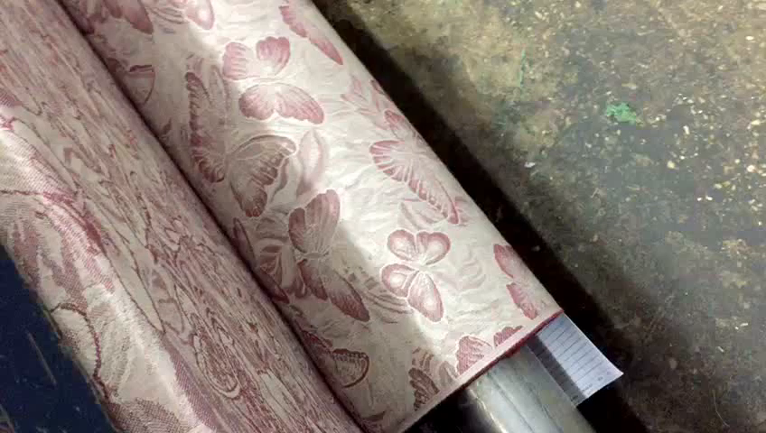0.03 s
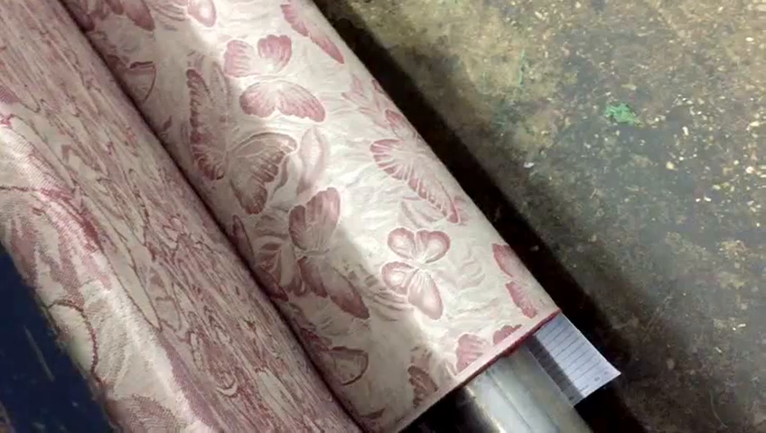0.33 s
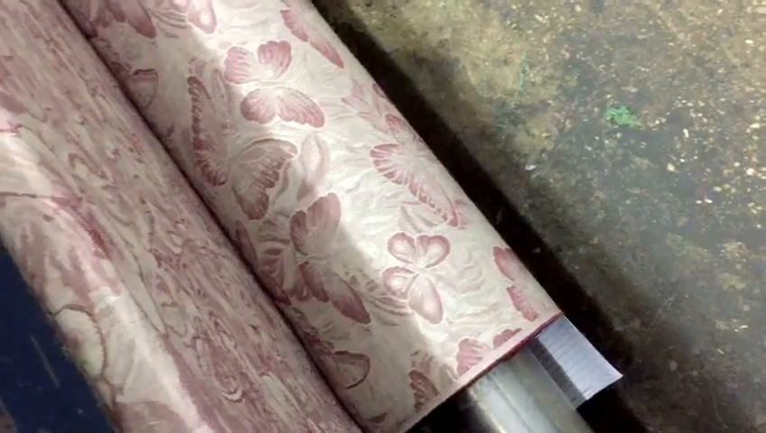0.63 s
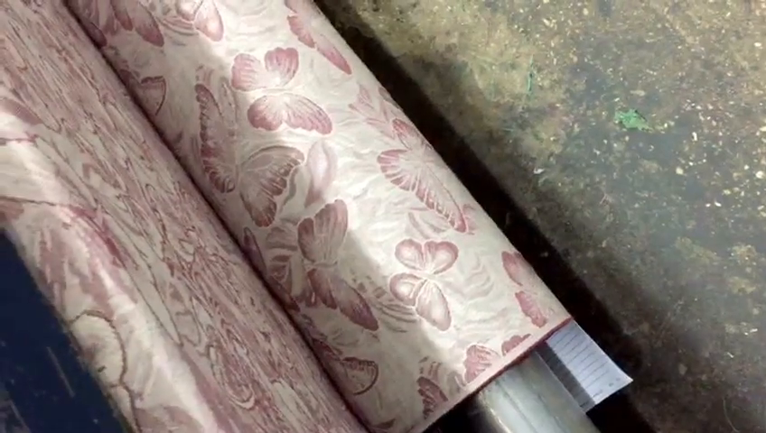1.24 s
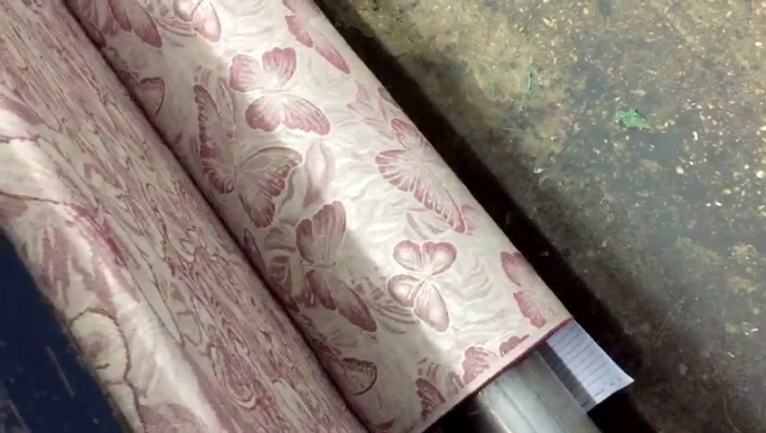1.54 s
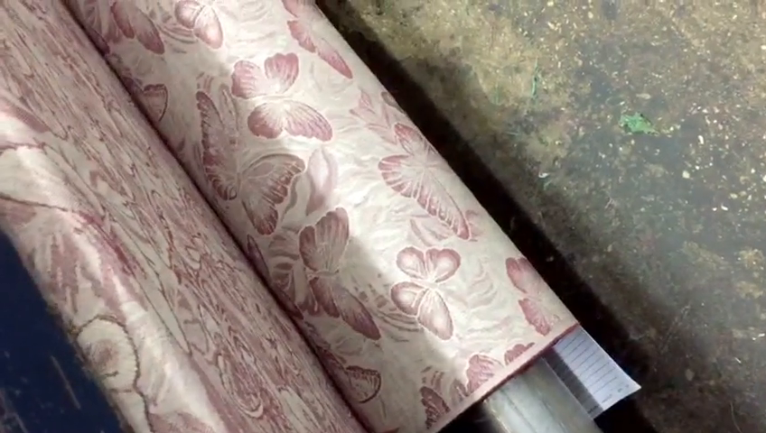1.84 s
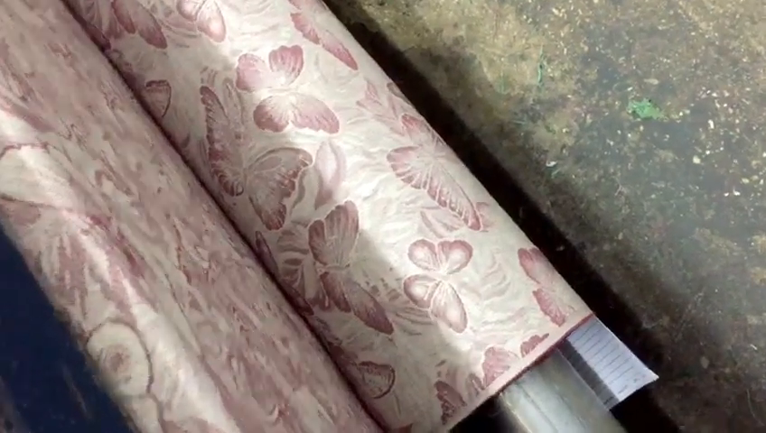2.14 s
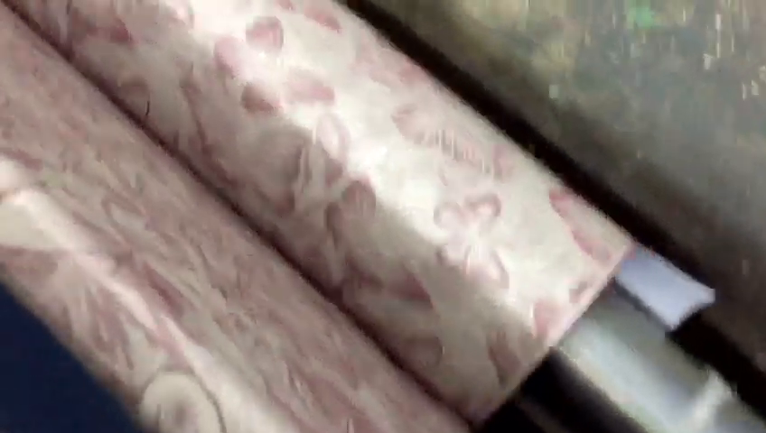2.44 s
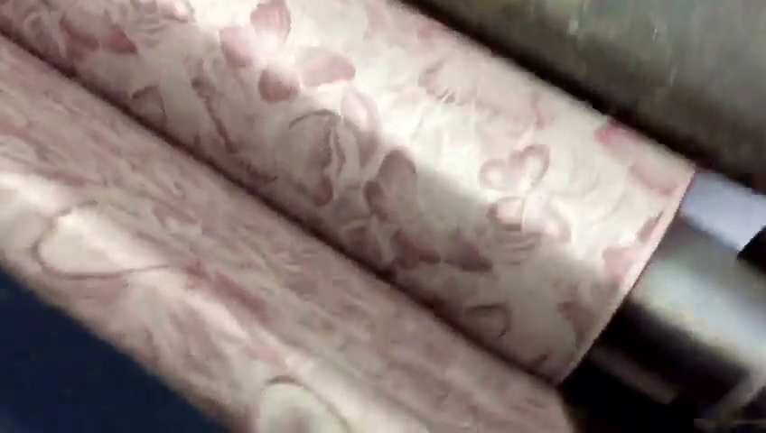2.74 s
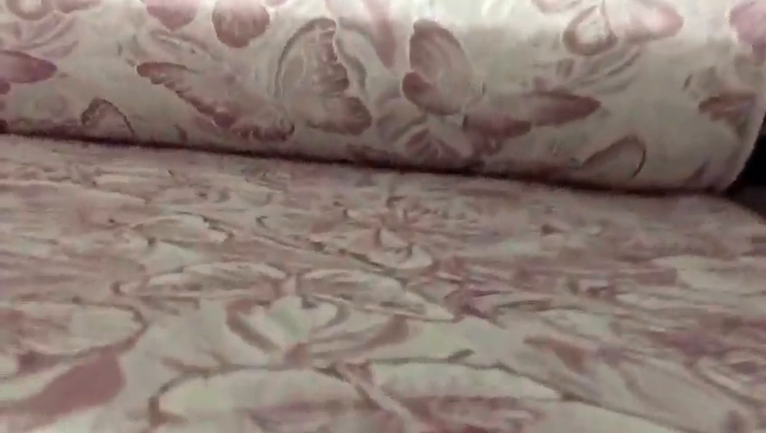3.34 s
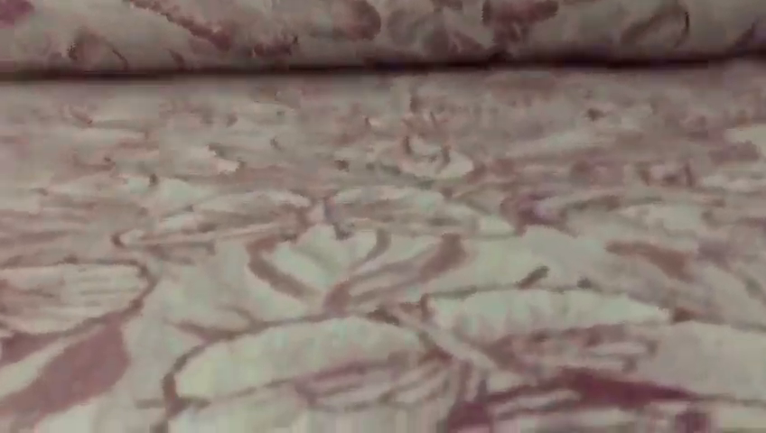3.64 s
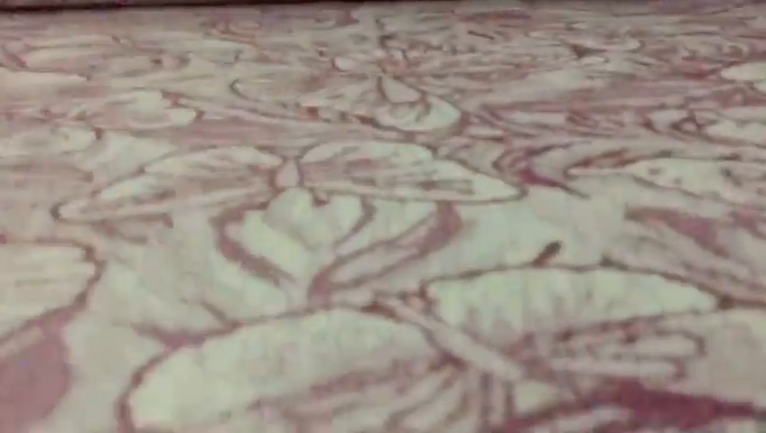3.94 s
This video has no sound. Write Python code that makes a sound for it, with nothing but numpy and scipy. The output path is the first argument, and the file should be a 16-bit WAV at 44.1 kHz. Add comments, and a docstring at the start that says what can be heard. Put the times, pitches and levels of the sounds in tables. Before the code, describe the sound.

A power loom runs close by, thumping and clacking almost six times a second with rattling metal and short swishes. Other machines roar steadily in the workshop, and the clatter dulls slightly as the microphone turns to the cloth.

```python
"""A workshop full of machine din, where a power loom close by runs at almost six picks a second.
In every cycle the same blows excite the modes of the frame and rattle its metal parts, the reed heaves,
the weft carrier swishes out and in, and a rubbing part groans. The drive drones and hums, wire heddles
tick, and a few faint hoots rise over the din. The treble dulls as the microphone turns to the cloth."""
import sys
import numpy as np
from scipy import signal
from scipy.fft import rfft, irfft, next_fast_len
from scipy.io import wavfile
from scipy.ndimage import map_coordinates

SR = 44100
rng = np.random.default_rng(int(sys.argv[2]) if len(sys.argv) > 2 else 0)


def write(x):
    x = np.atleast_2d(x).T
    wavfile.write(sys.argv[1], SR, np.round(np.clip(x, -1, 1) * 32767).astype(np.int16))


N = 176400
FIRST_BEAT_S, CYCLE_S = .13, .16998  # the beat-up: the reed drives the weft into the cloth

# Spectra of the other machines, the wooden and cast parts, the loose steel and the sliding carrier.
# Each row: frequency in Hz, relative spectral density in dB.
DIN_SPECTRUM = [(25, -28), (40, -17), (54, -6.5), (85, -3.5), (180, -2), (300, -3.5), (440, -7), (560, -3),
                (720, -6.5), (800, -10), (1000, -10.5), (1250, -15), (1700, -11.5), (2800, -14.5),
                (4200, -19.5), (5000, -22.5), (7000, -24.5), (10000, -30)]
KNOCK_SPECTRUM = [(60, -28), (170, -5.5), (300, 7.5), (440, -6), (620, -8.5), (800, 0), (1020, 4.5),
                  (1250, -14.5), (2500, -42), (9000, -52)]
CLACK_SPECTRUM = [(300, 1), (900, 9.5), (1250, 3.5), (1700, 9.5), (2800, 6), (4300, 1.5), (5000, 0),
                  (6300, -0.5), (10000, -7)]
SWISH_SPECTRUM = [(500, -20), (1300, 3), (1900, -2), (3000, 2.5), (4200, -2.5), (4900, -2), (6500, 0),
                  (8000, -1.5), (10000, -4)]
# Resonances of the drive and the loose steel. Each row: frequency in Hz, width in Hz, relative gain in dB.
DRIVE_MODES = [(121, 15, -5), (501, 15, -4), (537, 14.5, 0.5), (634, 34, -8.5), (717, 40, -11.5)]
STEEL_MODES = [(1498, 25, -6.5), (1590, 27, -2.5), (1803, 38, -8), (1933, 24, -0.5), (2160, 32, -0.5),
               (2346, 32, -4.5), (2790, 62, -3.5), (3313, 80, -6.5), (4360, 180, -8)]
# Tones of the motor and gears. Each row: frequency in Hz, starting level in dB, final level in dB.
HUM_TONES = [(132.2, -25.5, -23.5), (301, -36, -26.5), (550, -28, -29.5)]
# Blows of one cycle. Each row: seconds from the beat-up, then relative thump, knock and clack in dB.
CYCLE_BLOWS = [(-.033, -7.5, -3.5, -4.5), (-.0125, -3, -3.5, -1.5), (-.003, 3.5, 1.5, 2),
               (.0015, -12.5, -1.5, 1.5), (.008, -1, -5.5, -3), (0.021, -22, -2, -5.5),
               (.031, -7.5, -2.5, -7.5), (0.05, -18, -16, -13), (0.067, -9.5, -27, -20),
               (.100, -25, -39, -19)]
# Modes of the frame. Each row: frequency in Hz, relative level in dB, seconds to decay by 60 dB.
FRAME_MODES = [(85, -8.5, 0.079), (118.5, -1.5, 0.088), (138, -5.5, 0.05), (169, 1, 0.069),
               (206.4, -2.5, 0.031), (289, -3.5, 0.063), (360, -1, 0.075)]
# Nearness of the moving microphone. Each row: time in seconds, gains of heavy and loose parts in dB.
BLOW_NEARNESS = [(.1, 1.5, -0.5), (.6, -1, -2), (1.5, .5, -1.5), (2.6, -0.5, -0.5), (3.03, 0.5, -0.3),
                 (3.2, 1, -4.5), (4, 2, -6)]
# Carrier strokes. Each row: seconds from the beat-up, Gaussian half width in seconds, level in dB.
CARRIER_STROKES = [(-.023, 0.02, -21), (0.045, 0.016, -22)]
# Faint hoots. Each row: start in seconds, length in seconds, first and last pitch in Hz, level in dB.
HOOT_GLIDES = [(1.767, 0.081, 722, 730, -17), (2.521, .1, 624, 595, -19.5), (2.606, 0.042, 577, 525, -18),
               (2.686, 0.074, 693, 668, -19), (2.857, 0.27, 626, 612, -23), (3.08, 0.1, 605, 565, -23),
               (3.904, 0.056, 588, 568, -18.5)]
# Slow changes of the drive, steel, groan and treble. Each row: time in seconds, gain in dB.
DRIVE_GAIN = [(.1, -27.5), (1.2, -28), (2.3, -35), (2.8, -28.5), (3.4, -22.5), (4, -24)]
STEEL_GAIN = [(.1, -26.5), (3, -29), (3.25, -23.5), (4, -26)]
GROAN_GAIN = [(.1, -39), (2.4, -25), (3.25, -22), (3.469, -16), (3.8, -16), (4, -10)]
TREBLE_GAIN = [(.1, -1), (.45, -1), (0.699, 1), (1.801, 1), (2.601, 0.8), (3.1, -.5), (3.5, -0.6),
               (4, -1.5)]


def amp(db):
    """Amplitude grows tenfold with every 20 dB."""
    return 10 ** (np.asarray(db) / 20)


def unit(x):
    """Division by the rms gives a signal unit power."""
    return x / np.sqrt(np.mean(x ** 2) + 1e-20)


def clock():
    """Uniform sampling: the time of each sample in seconds."""
    return np.arange(N) / SR


def gain_curve(points):
    """A gain interpolated in decibels between (seconds, dB) points."""
    return amp(np.interp(clock(), *np.transpose(points)))


def since(moment_s):
    """Periodic time: signed seconds from the nearest recurrence of a moment in the cycle."""
    return (clock() - FIRST_BEAT_S - moment_s + CYCLE_S / 2) % CYCLE_S - CYCLE_S / 2


def wobble(rate):
    """Smooth random modulation through `rate` knots a second."""
    knots = rng.standard_normal(int(N * rate / SR) + 4)
    return map_coordinates(knots, [np.arange(N) * rate / SR])


def filtered(x, response):
    """A linear filter multiplies the spectrum by its frequency response."""
    size = next_fast_len(N + SR // 2)
    return irfft(rfft(x, size) * response(np.fft.rfftfreq(size, 1 / SR)), size)[:N]


def coloured(x, spectrum):
    """Spectral shaping by (Hz, dB) points, at unit power."""
    hz, db = np.transpose(spectrum)
    return unit(filtered(x, lambda f: amp(np.interp(np.log(f + 1), np.log(hz), db))))


def resonant(x, modes):
    """Forced response of parallel resonators of alternating sign, at unit power."""
    def response(f):
        return sum((-1) ** k * amp(db) * 1j * f * width / (hz * hz - f * f + 1j * f * width)
                   for k, (hz, width, db) in enumerate(modes))
    return unit(filtered(x, response))


def chatter(repeat):
    """Dense tiny contacts merge into noise; the share `repeat` of its power recurs every cycle."""
    periodic = np.resize(rng.standard_normal(round(CYCLE_S * SR)), N)
    return np.sqrt(repeat) * periodic + np.sqrt(1 - repeat) * rng.standard_normal(N)


def fading(hits, t60_s, attack_s=.00072):
    """Incoherent vibrations add in power: the joint envelope of decays starting at each hit."""
    t = np.arange(SR // 2) / SR
    decay = amp(-60 * t / t60_s) * (1 - np.exp(-t / attack_s))
    return np.sqrt(np.abs(signal.fftconvolve(hits ** 2, decay ** 2)[:N]))


def din(level_db=-17.5):
    """The other machines superpose into a steady, rattling roar."""
    return amp(level_db + .7 * wobble(60)) * coloured(chatter(repeat=.13), DIN_SPECTRUM)


def drive():
    """Forced vibration: gears and cams keep a few resonances of the machine droning."""
    return gain_curve(DRIVE_GAIN) * resonant(chatter(repeat=.53), DRIVE_MODES)


def hum(waver_hz=3.46, waver_db=3):
    """The changing load modulates the motor and gear tones in frequency and amplitude."""
    out = np.zeros(N)
    for hz, start_db, end_db in HUM_TONES:
        phase = 2 * np.pi * np.cumsum(hz + waver_hz * wobble(24.96)) / SR
        out += amp(np.linspace(start_db, end_db, N) + waver_db * wobble(12)) * np.sin(phase)
    return out


def heddle_ticks(per_second=110, level_db=-25.5, spread_db=5.5):
    """Wire heddles collide as a Poisson process, each contact a brief burst of bright noise."""
    contacts = rng.random(N) < per_second / SR
    hits = contacts * amp(spread_db * np.clip(rng.standard_normal(N), -2, 2))
    return amp(level_db) * fading(hits, t60_s=.013) * coloured(rng.standard_normal(N), SWISH_SPECTRUM)


def strikes(levels_db, jitter_s=.0003, scatter_db=1.0):
    """A nearly periodic impulse train: each blow of each cycle varies a little in time and strength."""
    beats = FIRST_BEAT_S + CYCLE_S * np.arange(int(N / SR / CYCLE_S) + 1)
    offsets = np.array(CYCLE_BLOWS)[:, :1]
    chance = rng.standard_normal((len(CYCLE_BLOWS), 2, len(beats)))
    times = (offsets + beats + jitter_s * chance[:, 0]).ravel()
    strengths = amp(levels_db[:, None] + scatter_db * chance[:, 1]).ravel()
    return np.bincount(np.round(times * SR).astype(int), strengths, N)[:N]


def frame_thump(hits, level_db=-15, attack_s=.00099):
    """The impulse response of the frame is a sum of damped modes."""
    t = np.arange(SR // 2) / SR
    ring = sum(amp(db - 60 * t / t60) * np.sin(2 * np.pi * hz * t) for hz, db, t60 in FRAME_MODES)
    onset = 1 - np.exp(-t / attack_s)
    return amp(level_db) * signal.fftconvolve(hits, ring * onset)[:N]


def knock(hits, level_db=-18):
    """Impacts on wooden and cast parts give damped bursts of midrange noise."""
    return amp(level_db) * fading(hits, t60_s=.079) * coloured(chatter(repeat=.48), KNOCK_SPECTRUM)


def steel_clatter(hits, clack_db=-12, hall_relative_db=-20):
    """Loose steel rattles and rings at its resonances; the hall reverberates after each clack."""
    envelope = fading(hits, t60_s=.045)
    rattle = chatter(repeat=.033) * amp(.54 * wobble(900))
    clack = envelope * coloured(rattle, CLACK_SPECTRUM)
    hall = fading(hits, t60_s=.37) * coloured(rng.standard_normal(N), CLACK_SPECTRUM)
    ring = gain_curve(STEEL_GAIN) * resonant(envelope * rng.standard_normal(N), STEEL_MODES)
    return amp(clack_db) * (clack + amp(hall_relative_db) * hall) + ring


def blows():
    """Impact excitation: each blow sounds the heavy and the loose parts, louder when they are near."""
    _, thump_db, knock_db, clack_db = np.transpose(CYCLE_BLOWS)
    times, heavy_db, loose_db = np.transpose(BLOW_NEARNESS)
    heavy = frame_thump(strikes(thump_db)) + knock(strikes(knock_db))
    loose = steel_clatter(strikes(clack_db))
    heavy_gain = amp(np.interp(clock(), times, heavy_db))
    loose_gain = amp(np.interp(clock(), times, loose_db))
    return heavy_gain * heavy + loose_gain * loose


def weft_carrier():
    """Sliding friction makes a gritty swish, out before the beat-up and in after it."""
    strokes = sum(amp(db) * np.exp(-.5 * (since(s) / half) ** 2) for s, half, db in CARRIER_STROKES)
    flutter = amp(2.1 * wobble(24.97))
    grit = rng.standard_normal(N) * amp(2.04 * wobble(1200))
    return strokes * flutter * coloured(grit, SWISH_SPECTRUM)


def reed_heave(hz=81, level_db=-21, half_width_s=.016):
    """The reaction to the swinging reed gives the frame one deep push just before each beat-up."""
    t = since(-.011)
    envelope = amp(level_db + wobble(3.9)) * np.exp(-.5 * (t / half_width_s) ** 2)
    return envelope * np.sin(2 * np.pi * hz * t)


def groan(centre_hz=526, sag_hz_per_s=585, half_width_s=.015):
    """Friction at a rubbing part sounds a short falling tone between beats."""
    t = since(.1163)
    hz = centre_hz - sag_hz_per_s * t + 8 * wobble(80)
    envelope = gain_curve(GROAN_GAIN) * np.exp(-.5 * (t / half_width_s) ** 2)
    return envelope * np.sin(2 * np.pi * np.cumsum(hz) / SR)


def hoots():
    """Nearly pure tones swell and glide a little; phase is the integral of frequency."""
    out = np.zeros(N)
    for start_s, length_s, start_hz, end_hz, db in HOOT_GLIDES:
        progress = np.clip((clock() - start_s) / length_s, 0, 1)
        hz = start_hz + (end_hz - start_hz) * progress + 3 * wobble(40)
        swell = np.sqrt(np.abs(np.sin(np.pi * progress)))
        out += amp(db) * swell * np.sin(2 * np.pi * np.cumsum(hz) / SR)
    return out


def scene(treble_hz=1300):
    """The sources superpose; the microphone's directivity makes the treble follow its aim."""
    mix = din() + drive() + hum() + heddle_ticks()
    mix += blows() + weft_carrier() + reed_heave() + groan() + hoots()
    treble = filtered(mix, lambda hz: hz ** 2 / (hz ** 2 + treble_hz ** 2))
    return (mix + treble * (gain_curve(TREBLE_GAIN) - 1))[None]


def record(dry, low_cut_hz=42, opens_s=.084, ceiling=.98, top_hz=10400):
    """The recorder opens after a moment; it passes a limited band, and saturation rounds the peaks."""
    high_pass = signal.butter(N=3, Wn=low_cut_hz, btype="high", fs=SR, output="sos")
    x = signal.sosfilt(high_pass, dry[0]) * (clock() > opens_s)
    x = x / (1 + np.abs(x / ceiling) ** 6) ** (1 / 6)
    return filtered(x, lambda hz: 1 / np.sqrt(1 + (hz / top_hz) ** 160))[None]


dry = scene()
out = record(dry)
write(out)
```